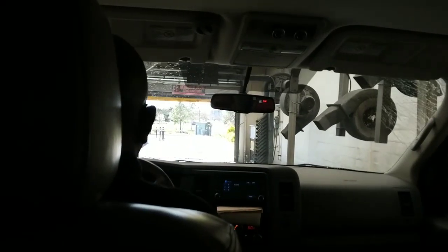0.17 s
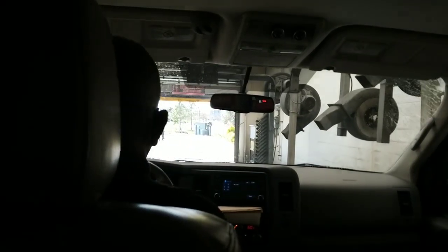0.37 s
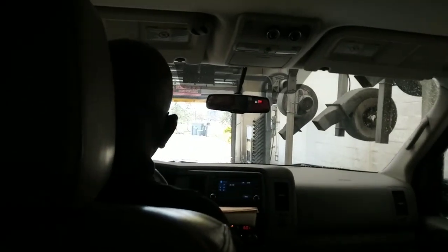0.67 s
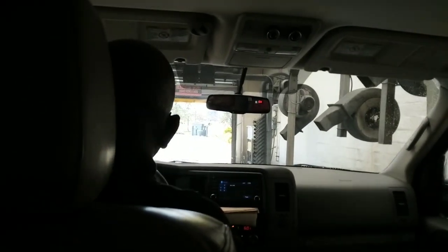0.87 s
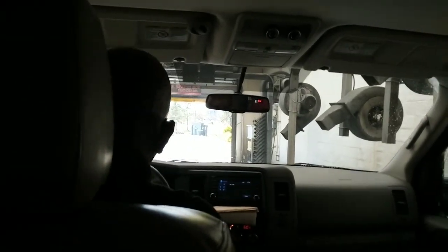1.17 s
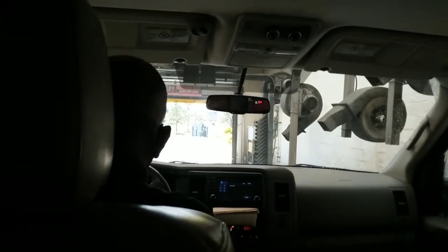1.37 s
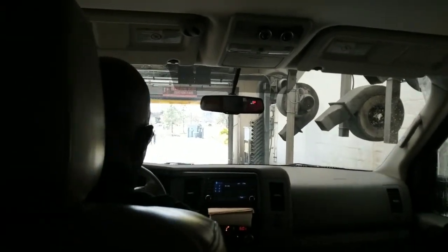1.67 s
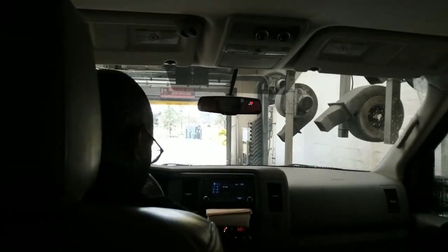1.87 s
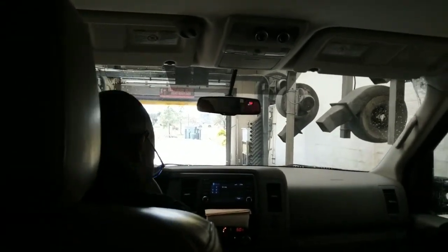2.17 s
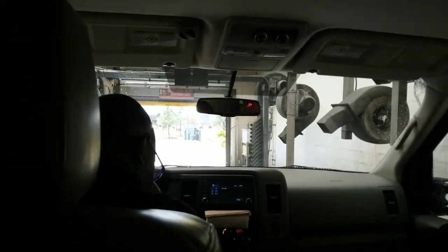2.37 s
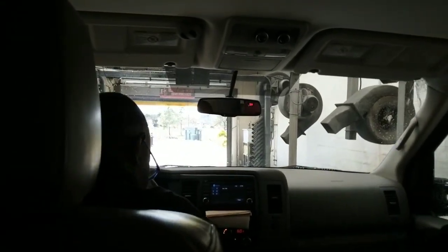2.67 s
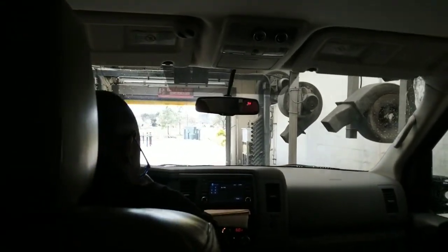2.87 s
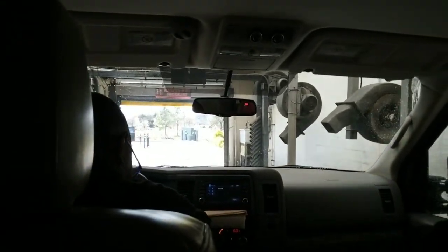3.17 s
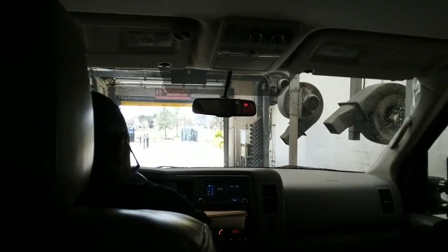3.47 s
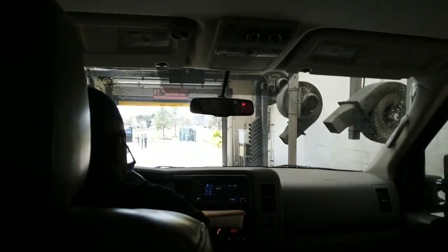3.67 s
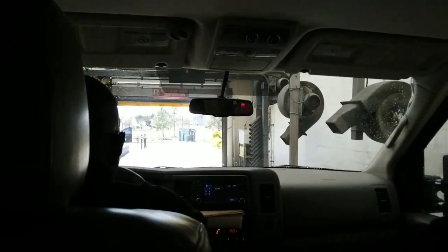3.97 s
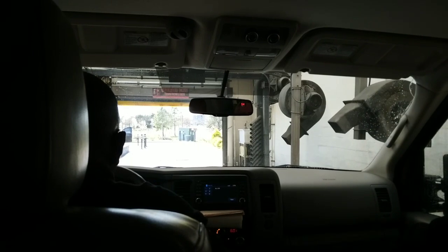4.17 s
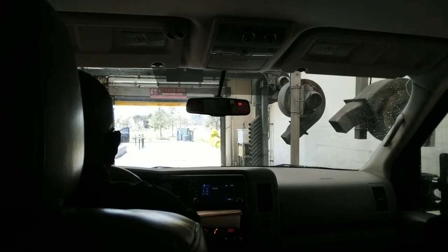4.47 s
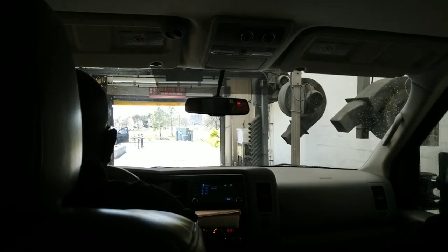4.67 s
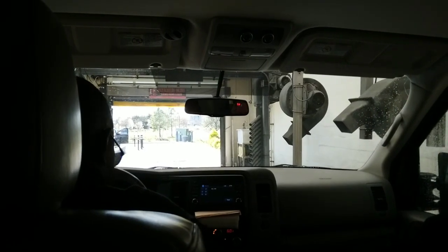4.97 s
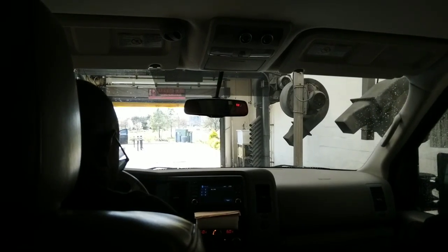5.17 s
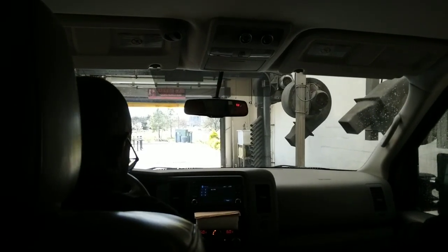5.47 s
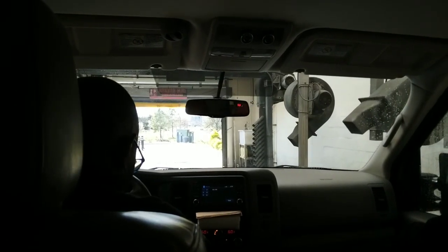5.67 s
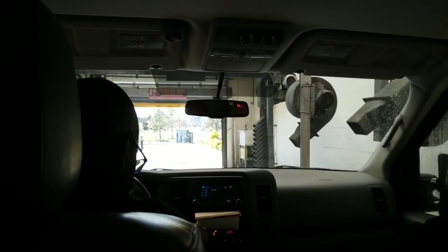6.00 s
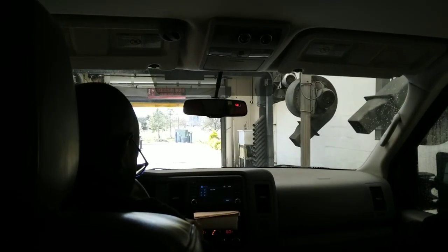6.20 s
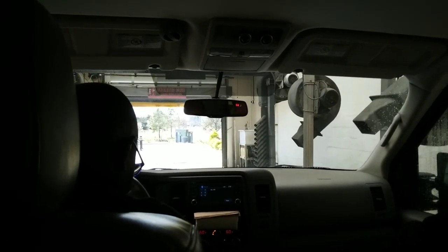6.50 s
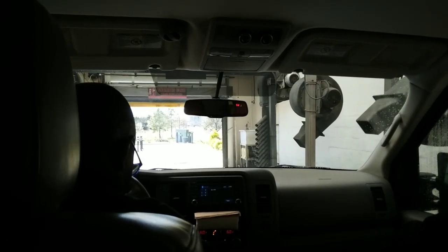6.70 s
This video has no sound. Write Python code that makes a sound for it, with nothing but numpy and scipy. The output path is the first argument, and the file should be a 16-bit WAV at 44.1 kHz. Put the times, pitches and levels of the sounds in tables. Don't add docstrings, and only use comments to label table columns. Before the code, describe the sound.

Deep, heavy blower roar pounds a car cabin, surging unevenly, with faint air hiss, fan hum, brief trim rattles and tiny sharp ticks.

```python
import sys
import numpy as np
from scipy import signal
from scipy.fft import rfft, irfft, next_fast_len
from scipy.io import wavfile
from scipy.ndimage import uniform_filter1d

SR = 44100
rng = np.random.default_rng(int(sys.argv[2]) if len(sys.argv) > 2 else 0)


def invert_db(x):
    u = np.asarray(x, float) / 20
    return 10 ** u


def generate_wav(signal):
    frames = np.transpose(np.atleast_2d(signal))
    scaled = np.clip(frames, -1, 1) * 32767
    pcm = np.round(scaled).astype(np.int16)
    wavfile.write(sys.argv[1], SR, pcm)


N = 301644
SIZE = next_fast_len(N)
FREQ = np.arange(SIZE // 2 + 1) * SR / SIZE + 1e-3

# [t/s, boom level/dB, panel level over boom/dB, glass level over boom/dB]
JETS = [(0.0, -8, -4, -22.5), (0.15, -18, 4, -12), (0.4, -11.5, 0, -13.5), (0.51, -8, -3, -23.5),
        (0.55, -18, 7, -7.5), (0.57, -12, 1.5, -15.5), (0.72, -8, -5, -18), (0.78, -20.5, 11.5, -6),
        (0.91, -5.5, -4.5, -18.5), (0.95, -10.5, 4, -15), (1.01, -7.5, -5.5, -19.5),
        (1.05, -10.5, 2.5, -14), (1.29, -15, 8, -10.5), (1.37, -9, -3, -17.5), (1.43, -14.5, 4, -10),
        (1.5, -10, 0.5, -17), (1.66, -14.5, 3, -12.5), (1.71, -9.5, -2.5, -16.5), (1.81, -14, 7.5, -13),
        (1.85, -5.5, -8, -18.5), (1.92, -19, 6, -9), (1.98, -9, -0.5, -18), (2.04, -14, 3.5, -11.5),
        (2.19, -8.5, -7.5, -17), (2.25, -23, 14, -4), (2.28, -13, 3.5, -15), (2.38, -17.5, 5.5, -10),
        (2.42, -8.5, -3, -18.5), (2.46, -19.5, 8, -9), (2.57, -9.5, -3, -19.5), (2.72, -22.5, 11, -6.5),
        (2.76, -12, 2.5, -14), (2.86, -16.5, 2, -13.5), (2.89, -7, -5.5, -17.5), (3.01, -15, 6.5, -12),
        (3.09, -10.5, -4, -17), (3.18, -16.5, 5.5, -11.5), (3.27, -12, 2, -13), (3.43, -13.5, 1, -14.5),
        (3.49, -16, 5, -7), (3.58, -14, 0, -11.5), (3.83, -14.5, 5, -13), (3.98, -10.5, -4, -15),
        (4.21, -15.5, 2.5, -13.5), (4.32, -11.5, -2.5, -16.5), (4.4, -17, 3, -10), (4.84, -13.5, 0.5, -14),
        (4.93, -25.5, 7.5, -3.5), (4.97, -12.5, -2.5, -13.5), (5.22, -16.5, 5.5, -13),
        (5.28, -11.5, -1.5, -17.5), (5.52, -17, 3, -11), (5.68, -9, 0, -17), (5.72, -17.5, 7.5, -8),
        (5.9, -14, 3.5, -13), (6.0, -21, 11.5, -4), (6.04, -8, 0, -18.5), (6.1, -10.5, -0.5, -15),
        (6.19, -13.5, 3.5, -14), (6.27, -14, 9.5, -8), (6.32, -6.5, -5.5, -17), (6.5, -12, 7, -12.5),
        (6.71, -5.5, -2.5, -19), (6.74, -13.5, 6, -10.5), (6.84, -6.5, 1, -15)]
# [t/s, level/dB]
SEAL_LEAKS = [(0.0, -42), (0.82, -41.5), (1.08, -39.5), (1.49, -40), (1.85, -39), (2.46, -40.5),
              (3.09, -40), (3.39, -37.5), (4.19, -39.5), (4.5, -38), (5.11, -39), (6.17, -38.5),
              (6.84, -38)]
# [f/Hz, level per Hz/dB]
ROAR_COLOUR = [(8.8, -46.5), (15, -9.5), (53, -8.5), (81, -1.5), (98, 6.5), (124, -3), (195, -5),
               (229, -7.5), (297, -5.5), (401, -19.5), (462, -18.5), (550, -22.5), (691, -23),
               (1000, -35.5), (1300, -71), (2200, -120)]
# [f/Hz, level per Hz/dB]
HISS_COLOUR = [(470, -30), (800, 2.5), (862, 7), (1080, -8), (2070, -14), (2410, -17), (3260, -16.5),
               (5720, -30.5), (6570, -30), (8230, -40.5), (11300, -59.5), (15200, -57.5), (16000, -77)]
# [f/Hz, width/Hz, level over the roar/dB]
CABIN_MODES = [(92.5, 30, 1), (153.3, 25, 4), (211, 37, 2.5), (290, 36, -1.5)]
# [f/Hz, likeness from 0 to 1]
ALIKE = [(60, 0.99), (130, 0.94), (290, 0.84), (640, 0.34), (1410, 0), (3100, 0.13), (6820, 0.0),
         (15000, 0)]
# [f/Hz, left minus right level/dB]
LEAN = [(60, -2.5), (110, 0.5), (200, 1.0), (380, -0.5), (700, 0), (1290, -2), (2380, 1), (4400, 1.5),
        (8120, 8.5), (15000, 1.5)]
# [t/s, peak level/dB, brightness level/dB, length/s]
RATTLES = [(0.647, -29.5, -30, 0.039), (0.7956, -33, -35, 0.027), (0.811, -31, -29, 0.028),
           (0.8875, -29.5, -26.5, 0.035), (0.907, -30, -27.5, 0.03), (1.0486, -25, -23, 0.039),
           (1.1013, -25, -29, 0.03), (1.176, -31.5, -28, 0.037), (1.448, -27.5, -29.5, 0.03),
           (1.502, -28, -24, 0.034), (1.611, -26.5, -29.5, 0.042), (1.6723, -28, -28, 0.03),
           (1.841, -28.5, -25.5, 0.028), (1.8991, -29, -27.5, 0.03), (1.923, -28, -29, 0.022),
           (1.9545, -32, -28, 0.034), (1.982, -31.5, -27, 0.027), (2.0353, -25.5, -27.5, 0.044),
           (2.2034, -26, -27, 0.035), (2.4478, -26, -30, 0.034), (2.635, -31.5, -24.5, 0.03),
           (2.652, -28.5, -30.5, 0.03), (3.0023, -22, -27.5, 0.028), (3.1238, -26.5, -28, 0.036),
           (3.2195, -23, -27, 0.026), (3.258, -27, -29, 0.034), (3.3154, -27.5, -29, 0.03),
           (3.359, -31, -31, 0.048), (3.392, -25, -27, 0.043), (3.4405, -25.5, -27.5, 0.03),
           (3.4796, -26, -25.5, 0.03), (3.4966, -21.5, -25.5, 0.024), (3.533, -26, -27.5, 0.033),
           (3.6326, -24, -31, 0.024), (3.707, -30.5, -30, 0.035), (3.746, -29, -31, 0.03),
           (3.76, -31, -30.5, 0.027), (3.7784, -26, -32, 0.028), (3.8526, -31.5, -30, 0.033),
           (3.88, -31, -26.5, 0.035), (3.92, -23.5, -30, 0.03), (3.956, -28, -30, 0.03),
           (3.9937, -25, -28.5, 0.033), (4.143, -28.5, -31, 0.03), (4.3693, -21.5, -28, 0.024),
           (4.5036, -26.5, -31.5, 0.027), (4.5521, -30.5, -32.5, 0.026), (4.581, -35, -29.5, 0.03),
           (4.6334, -31.5, -26.5, 0.04), (4.687, -29, -34.5, 0.026), (4.838, -27.5, -29.5, 0.022),
           (4.9332, -28, -27, 0.03), (6.1654, -29.5, -26, 0.036), (6.273, -23.5, -25.5, 0.022),
           (6.305, -30, -29, 0.03), (6.388, -30.5, -24.5, 0.03), (6.409, -24, -32, 0.024),
           (6.489, -29, -27, 0.038), (6.672, -29.5, -29, 0.034), (6.7336, -27, -26.5, 0.023),
           (6.752, -29.5, -29, 0.02), (6.7943, -23.5, -25.5, 0.022)]
# [f/Hz, width/Hz, level/dB]
TRIM_MODES = [(1160, 97, 6.5), (1445, 60, 2.5), (2010, 51, 1.5), (2800, 560, -7), (3300, 410, -10),
              (4520, 1300, -16)]
# [t/s, peak level/dB]
TICKS = [(0.2558, -41.5), (0.4304, -43), (0.6185, -47.5), (0.8195, -47), (0.8724, -43.5), (0.8944, -37),
         (0.9413, -42), (1.0311, -42), (1.051, -38), (1.1598, -40), (1.1717, -36.5), (1.2526, -38),
         (1.297, -38), (1.3728, -37.5), (1.5628, -37), (1.5933, -41), (1.7145, -37), (1.7399, -42.5),
         (1.8098, -40.5), (1.915, -39), (2.1415, -40), (2.2618, -40.5), (2.3261, -46.5), (2.3865, -44.5),
         (2.4144, -43), (2.4394, -42.5), (2.4528, -38.5), (2.59, -50.5), (2.61, -37), (2.6968, -39.5),
         (2.7851, -37), (2.798, -35), (3.0485, -42), (3.0714, -38), (3.2016, -39.5), (3.2191, -41),
         (3.265, -40), (3.2894, -37), (3.485, -31), (3.5902, -35.5), (3.6301, -39), (3.712, -40),
         (4.0642, -43), (4.2462, -40), (4.2722, -40), (4.3216, -40.5), (4.372, -37), (4.4283, -46),
         (4.7621, -41), (4.7745, -38), (4.8364, -43), (5.0579, -47), (5.0579, -35), (5.0993, -42),
         (5.1582, -38.5), (5.2884, -43), (5.3438, -37), (5.4884, -38), (5.5977, -37), (5.6615, -46),
         (5.6965, -41), (5.7813, -40), (5.907, -38), (5.9549, -40), (5.9998, -42), (6.0686, -40),
         (6.1499, -47), (6.1649, -37), (6.2248, -39.5), (6.2382, -40), (6.2687, -35.5), (6.3315, -39.5),
         (6.3609, -36), (6.4004, -42), (6.4313, -38), (6.538, -42.5), (6.5525, -34), (6.6722, -36),
         (6.7072, -38), (6.7376, -34.5)]
# [t/s, level/dB]
SINGING = [(0.0, -49), (0.04, -58.5), (0.57, -57), (0.61, -51.5), (0.76, -60), (0.82, -51), (0.86, -54),
           (0.91, -46), (0.95, -51), (1.08, -45.5), (1.29, -48), (1.52, -50.5), (1.56, -53), (1.62, -47.5),
           (1.73, -55), (1.92, -48), (2.0, -50), (2.06, -42), (2.15, -60.5), (2.23, -41.5), (2.27, -53),
           (2.36, -63), (2.5, -50), (2.57, -60), (2.66, -47), (2.74, -53), (2.88, -49), (2.93, -59),
           (2.97, -46), (3.01, -45), (3.05, -53), (3.18, -55), (3.22, -35), (3.31, -50), (3.41, -36.5),
           (3.54, -46), (3.6, -53), (3.64, -49), (3.85, -50), (3.94, -47), (4.1, -54), (4.3, -52),
           (4.38, -44), (4.42, -50), (4.51, -44.5), (4.57, -54), (4.63, -45), (4.76, -55), (4.84, -45),
           (4.89, -52), (4.93, -44), (5.01, -61), (5.14, -52), (5.2, -59), (5.35, -52), (6.21, -50),
           (6.29, -45.5), (6.36, -67), (6.42, -40.5), (6.46, -54.5), (6.5, -48.5), (6.63, -52),
           (6.74, -44.5), (6.76, -51), (6.84, -41.5)]


def set_level(x, db):
    return x * invert_db(db) / np.sqrt(np.mean(x ** 2))


def curves(table):
    t, *columns = np.transpose(table)
    return [np.interp(np.arange(N) / SR, t, column) for column in columns]


def on_freq(table):
    hz, value = np.transpose(table)
    return np.interp(np.log(FREQ), np.log(np.maximum(hz, 1)), value)


def shape(x, gain):
    return irfft(rfft(x, SIZE) * gain, SIZE)[..., :N]


def resonance(hz, width_hz):
    return 1 / (1 + 1j * (FREQ - hz ** 2 / FREQ) / width_hz)


def walk(rate):
    hold = int(SR / rate)
    steps = np.repeat(rng.standard_normal(N // hold + 1), hold)
    smooth = uniform_filter1d(uniform_filter1d(steps, hold), hold)
    return 1.3 * smooth[:N]


def turbulence(colour):
    alike = np.clip(on_freq(ALIKE), 0, .995)
    mid, side = rfft(rng.standard_normal((2, SIZE)))
    shared = mid * np.sqrt(1 + alike)
    differing = side * np.sqrt(1 - alike) * np.array([[1], [-1]])
    lean = invert_db(on_freq(LEAN) * np.array([[.5], [-.5]]))
    return (shared + differing) * lean * colour


def region(spectrum, lo_hz, hi_hz):
    def above(hz, soft_octaves=0.22):
        return np.clip(.5 + np.log2(FREQ / hz) / (2 * soft_octaves), 0, 1)
    return irfft(spectrum * (above(lo_hz) - above(hi_hz)), SIZE)[:, :N]


def roar():
    boom_db, panel_db, glass_db = curves(JETS)
    modes = 1
    for hz, width_hz, db in CABIN_MODES:
        modes = modes + (invert_db(db) - 1) * np.abs(resonance(hz, width_hz)) ** 2
    air = turbulence(invert_db(on_freq(ROAR_COLOUR)) * modes)
    under = set_level(region(air, 5, 50), -27) * invert_db(.3 * (boom_db - boom_db.mean()))
    boom = set_level(region(air, 50, 131.8), 0.7) * invert_db(boom_db)
    panel = set_level(region(air, 131.5, 372.4), 0.45) * invert_db(boom_db + panel_db)
    glass = set_level(region(air, 371, 956), 1.8) * invert_db(boom_db + glass_db)
    return under + boom + panel + glass


def blade_hum():
    blade_hz = 468.6 * (1 + .003 * walk(5))
    phase = 2 * np.pi * np.cumsum(blade_hz) / SR
    strength = invert_db(-36 + 4.2 * walk(4.7))
    return strength * np.sqrt(2) * np.sin([phase, phase + .5])


def seals():
    air, gust = turbulence(invert_db(on_freq(HISS_COLOUR))), walk(10)
    hiss = 0
    for hz in (950., 1900., 3800., 7600.):
        hiss = hiss + region(air, hz, 2 * hz) * invert_db(0.47 * gust + 0.86 * walk(20))
    return set_level(hiss, 3.52) * invert_db(curves(SEAL_LEAKS)[0])


def singing_trim():
    push = rng.standard_normal((2, N)) * invert_db(curves(SINGING)[0])
    song = invert_db(28.5) * shape(push, resonance(1612, 69) ** 2)
    return song * invert_db(np.array([[-1.2], [1.2]]))


def ticks(boom):
    tick_hz, tick_width_hz = 6560, 320
    hits = np.zeros(N)
    t, db = np.transpose(TICKS)
    hits[(t * SR).astype(int)] = invert_db(db)
    fall = -np.gradient(shape(boom, resonance(140, 200).real))
    landing = signal.find_peaks(fall)[0]
    chance = np.clip(rng.standard_normal(len(landing)), -3, 1.6)
    force = np.clip(fall[landing] / fall.std(), 0, 3)
    hits[landing] += invert_db(-55.5 + 4.0 * chance) * force
    tick = invert_db(35) * shape(hits, resonance(tick_hz, tick_width_hz) * resonance(tick_hz, 1500))
    hard = hits * (hits / invert_db(-30.5)) ** 1.4
    crack = invert_db(13) * shape(hard, resonance(12500, 7000))
    return (tick + crack) * invert_db(np.array([[0], [-12]]))


def rattling_trim():
    body, bright = np.zeros((2, 2, N))
    for start_s, db, bright_db, length_s in RATTLES:
        i = int(start_s * SR)
        t = np.arange(min(4096, N - i)) / SR
        knock_times = rng.random(len(t)) < 250 / SR
        knocks = np.convolve(knock_times, np.exp(-np.arange(200) / 79.0))[:len(t)]
        knocks = knocks + np.exp(-t / 0.0014) + 0.18
        fade = np.exp(-(t / np.clip(length_s, .005, .08)) ** 2)
        burst = invert_db(db) * rng.standard_normal((2, len(t))) * knocks * fade
        body[:, i:i + len(t)] += burst
        bright[:, i:i + len(t)] += burst * invert_db(bright_db)
    panel = 0
    for k, (hz, width_hz, db) in enumerate(TRIM_MODES):
        panel = panel + (-1) ** k * invert_db(db) * resonance(hz, width_hz)
    dull = 1 / (1 + (FREQ / 6500) ** 6)
    rattle = invert_db(8.5) * shape(body, panel * dull)
    sizzle = invert_db(15.5) * shape(bright, resonance(7270, 2600) ** 3)
    return (rattle + sizzle) * invert_db(np.array([[-1.2], [1.2]]))


def scene():
    body = roar() + blade_hum()
    return body + seals() + singing_trim() + ticks(body[0]) + rattling_trim()


def low_pass(x):
    return signal.sosfilt(signal.butter(12, 17740, fs=SR, output="sos"), x)


def record(dry):
    knee = 11.0
    rounded = dry / (1 + np.abs(dry) ** knee) ** (1 / knee)
    soft = dry + shape(rounded - dry, 1 / (1 + (FREQ / 900) ** 4))
    mix = shape(np.clip(soft, -1, 1), FREQ < 15700)
    return low_pass(mix)


dry = scene()
out = record(dry)
generate_wav(out)
```